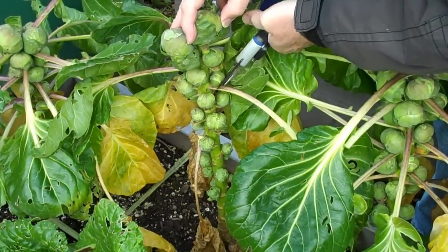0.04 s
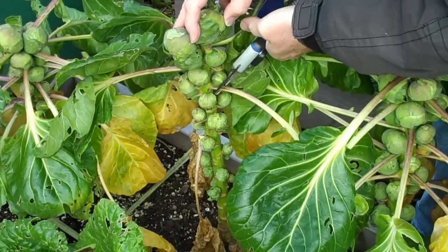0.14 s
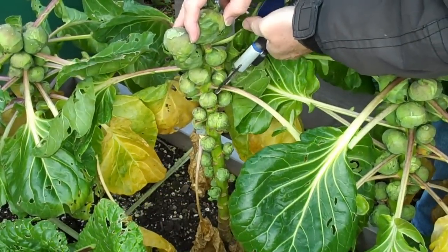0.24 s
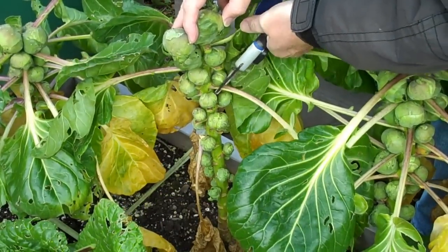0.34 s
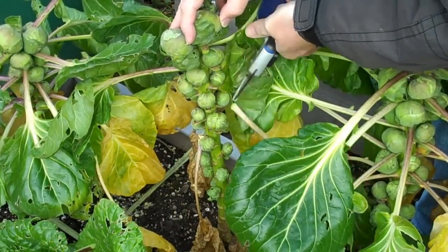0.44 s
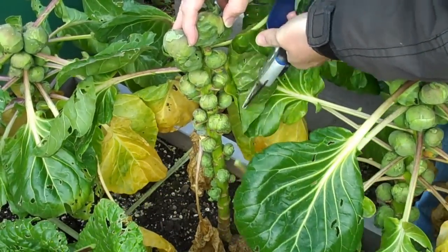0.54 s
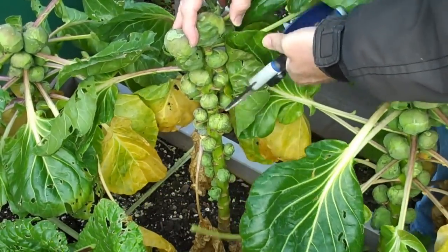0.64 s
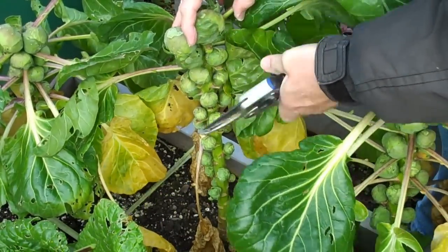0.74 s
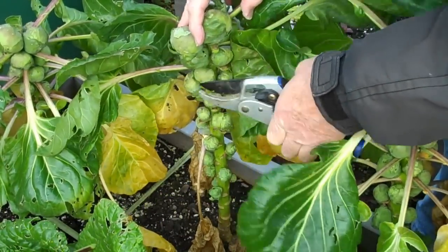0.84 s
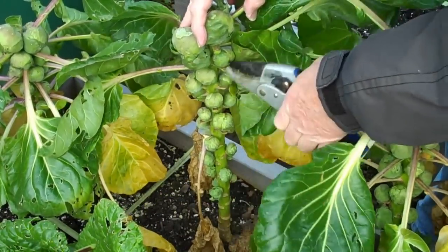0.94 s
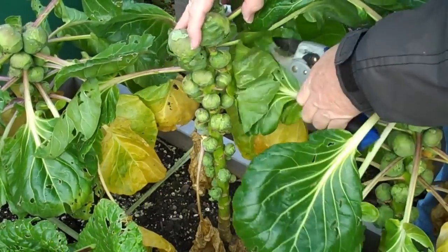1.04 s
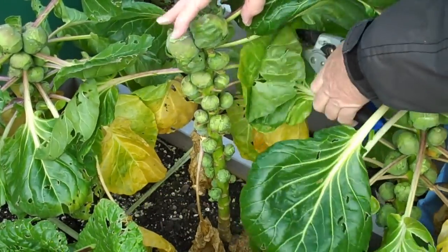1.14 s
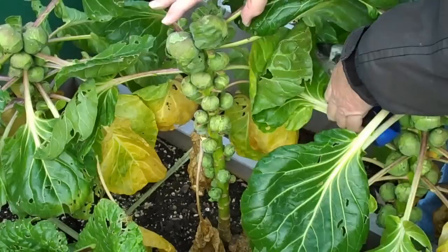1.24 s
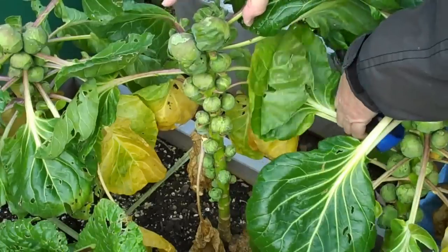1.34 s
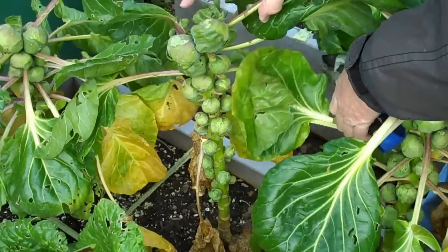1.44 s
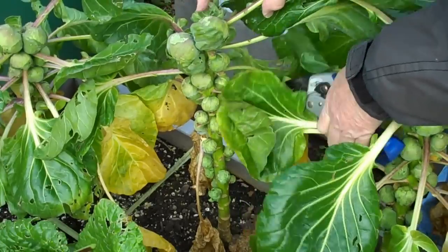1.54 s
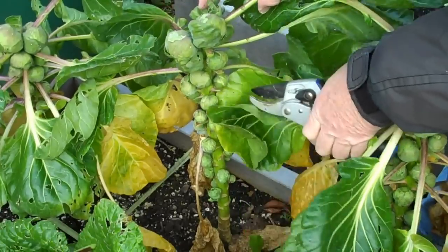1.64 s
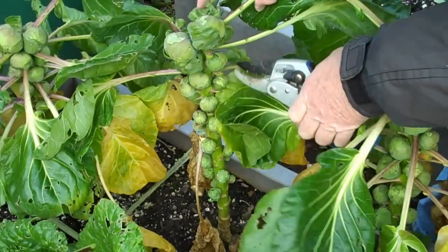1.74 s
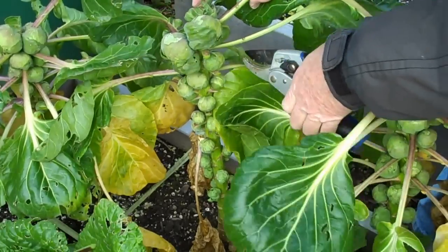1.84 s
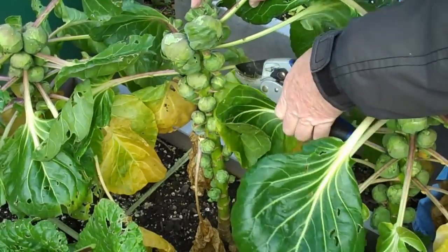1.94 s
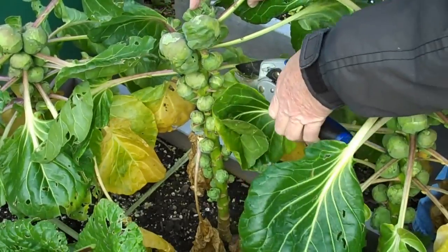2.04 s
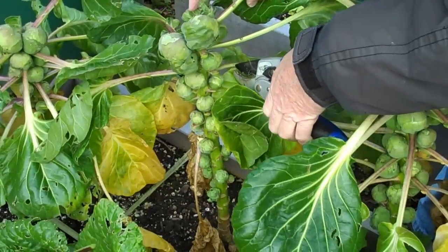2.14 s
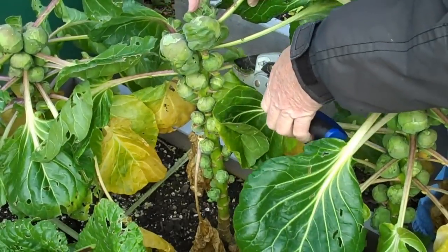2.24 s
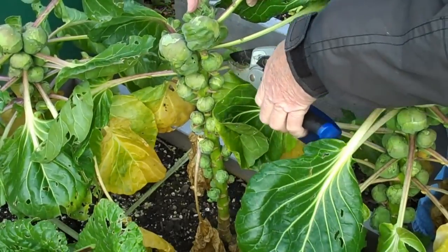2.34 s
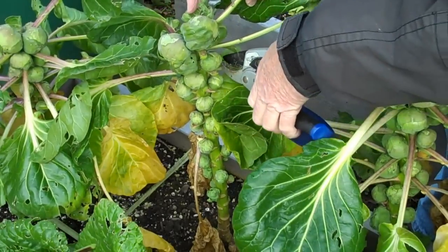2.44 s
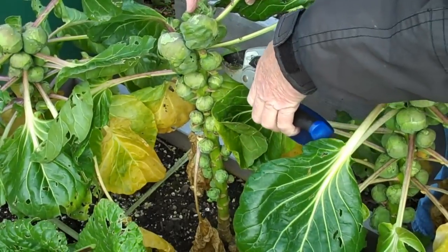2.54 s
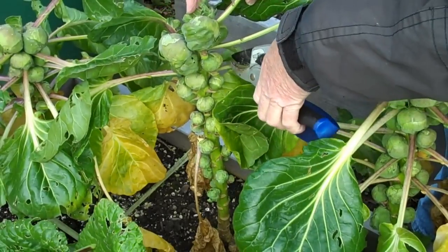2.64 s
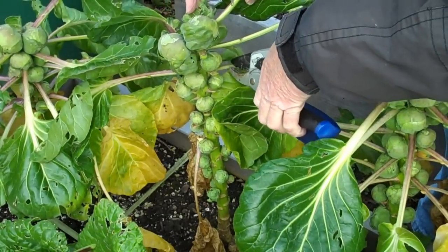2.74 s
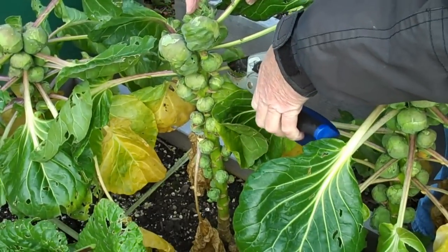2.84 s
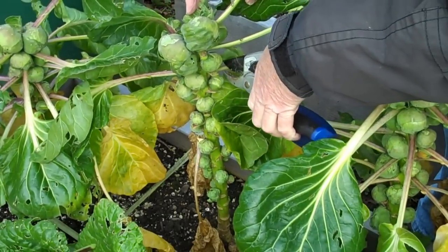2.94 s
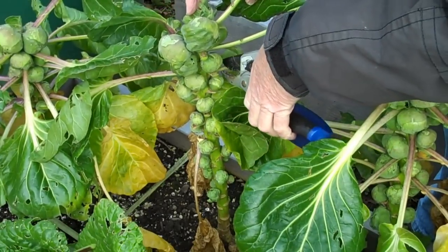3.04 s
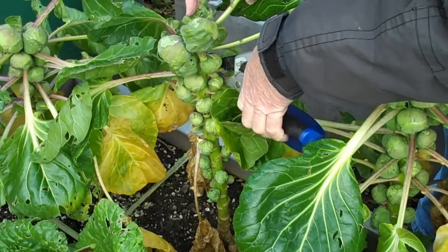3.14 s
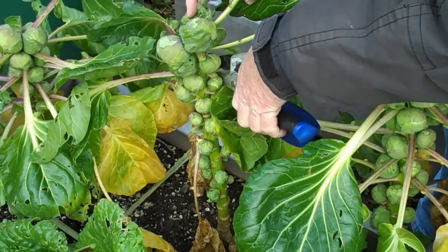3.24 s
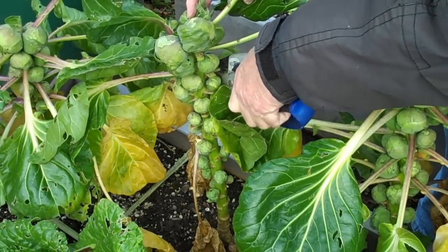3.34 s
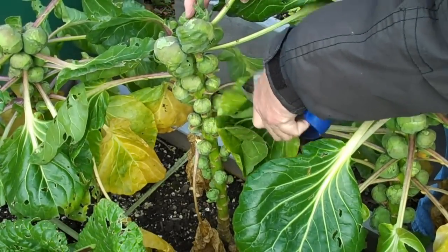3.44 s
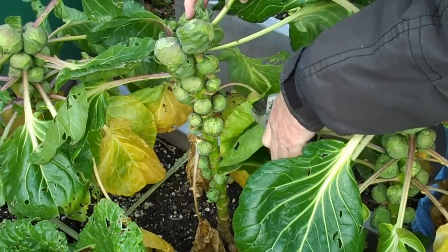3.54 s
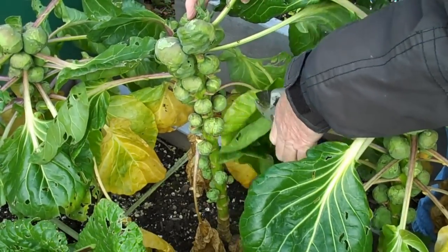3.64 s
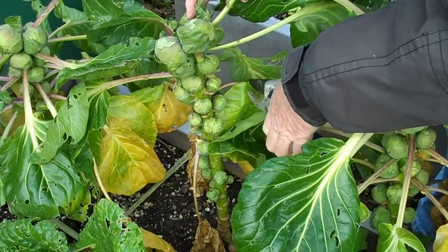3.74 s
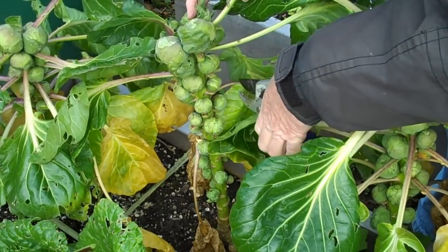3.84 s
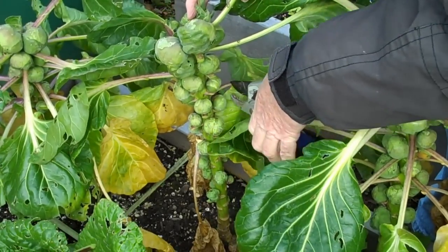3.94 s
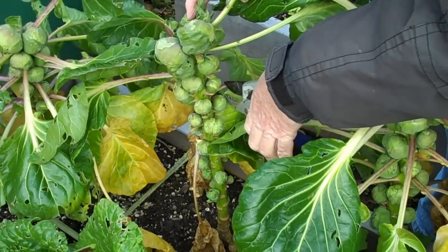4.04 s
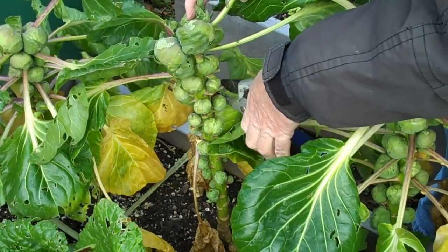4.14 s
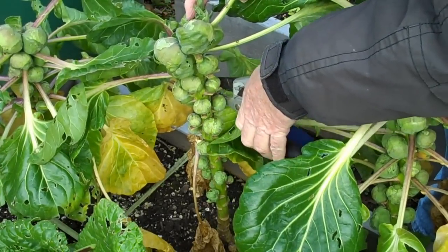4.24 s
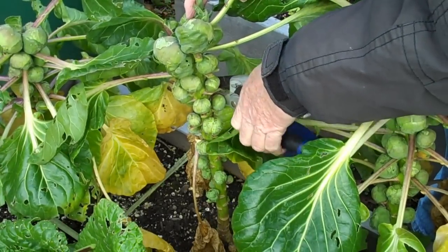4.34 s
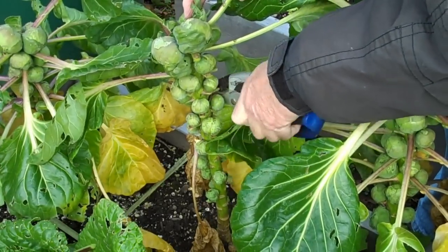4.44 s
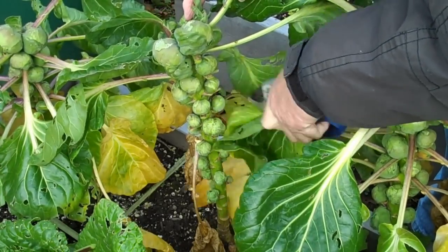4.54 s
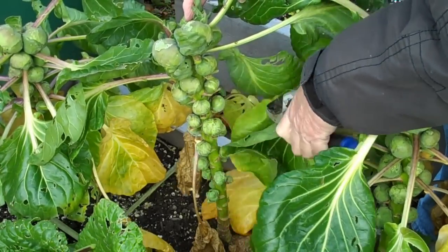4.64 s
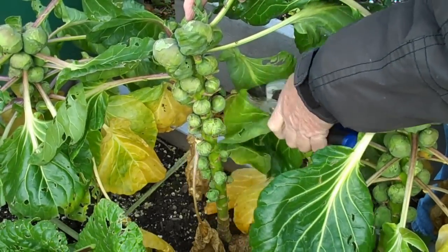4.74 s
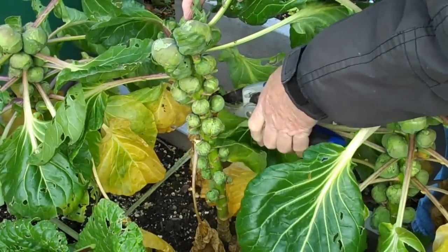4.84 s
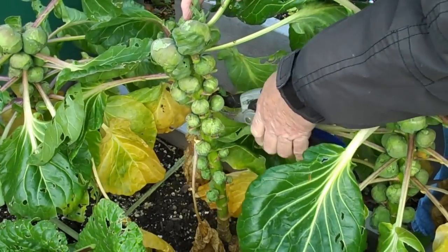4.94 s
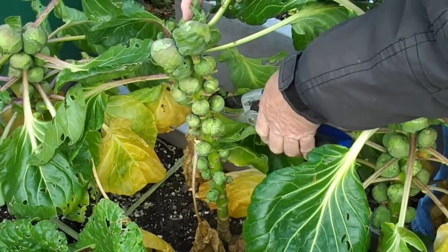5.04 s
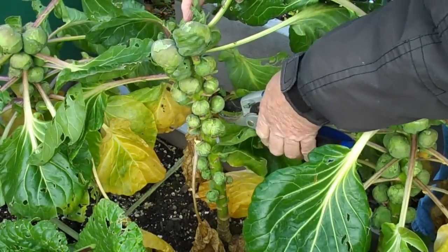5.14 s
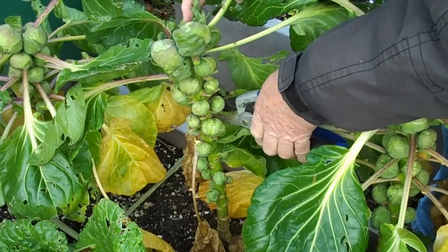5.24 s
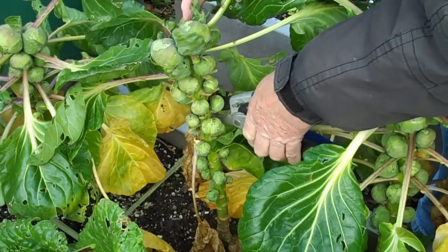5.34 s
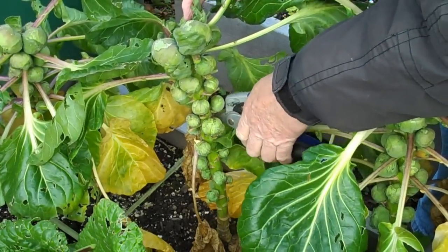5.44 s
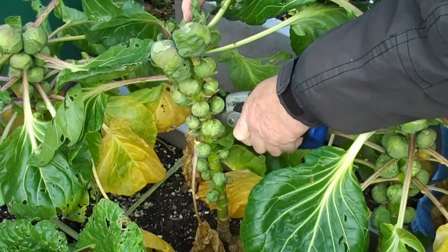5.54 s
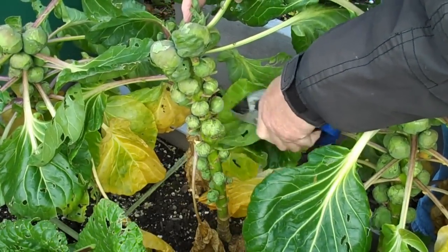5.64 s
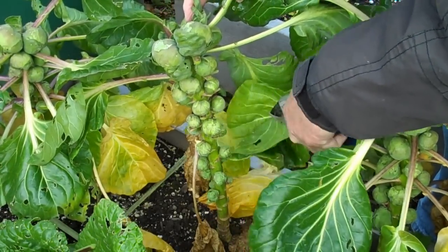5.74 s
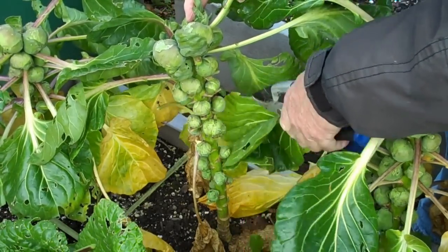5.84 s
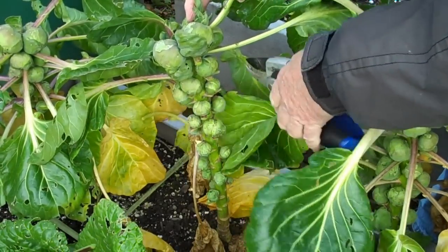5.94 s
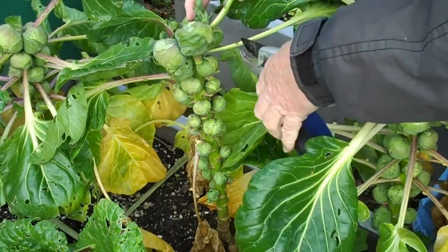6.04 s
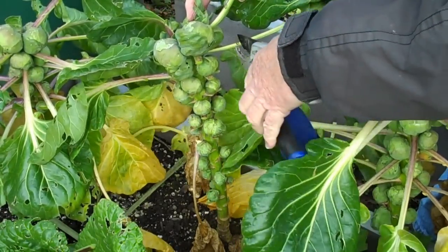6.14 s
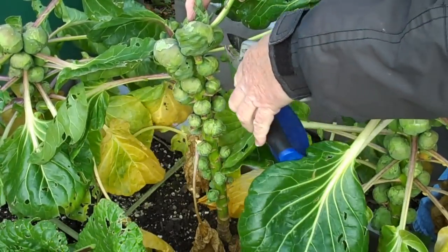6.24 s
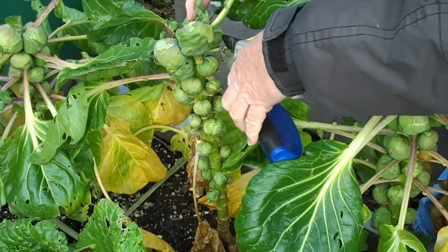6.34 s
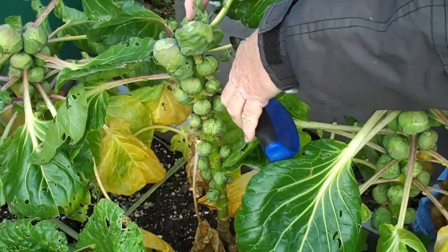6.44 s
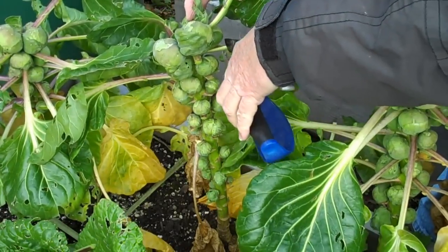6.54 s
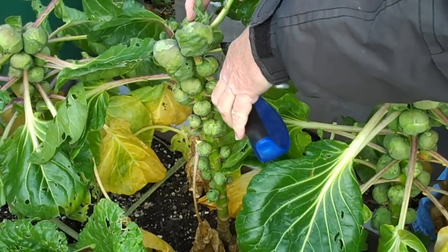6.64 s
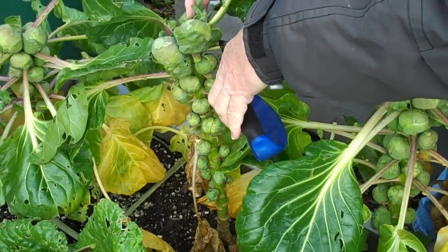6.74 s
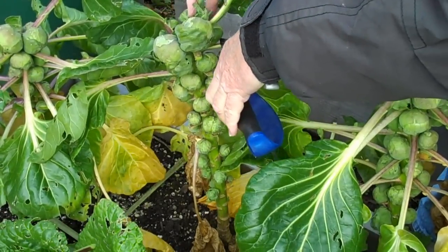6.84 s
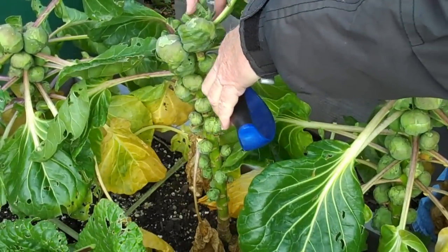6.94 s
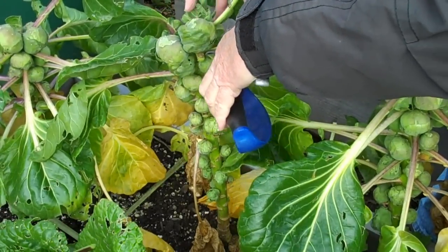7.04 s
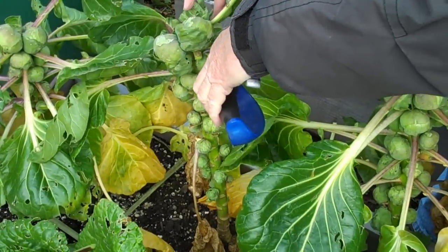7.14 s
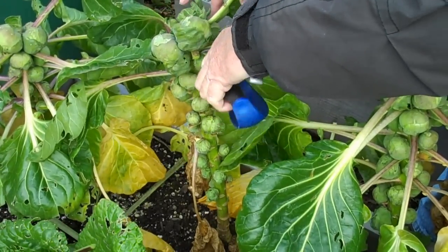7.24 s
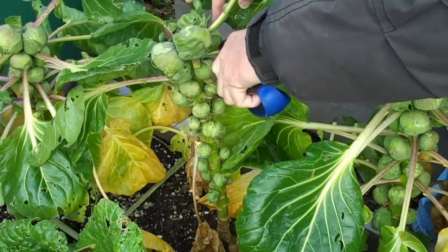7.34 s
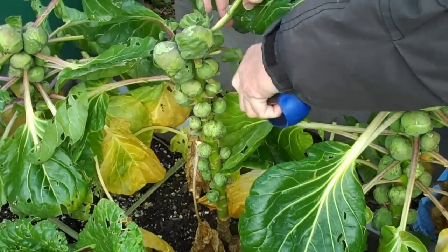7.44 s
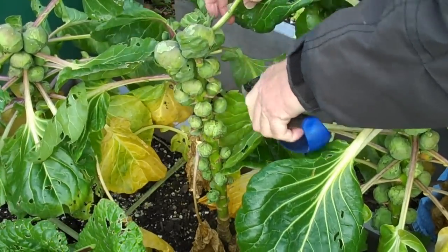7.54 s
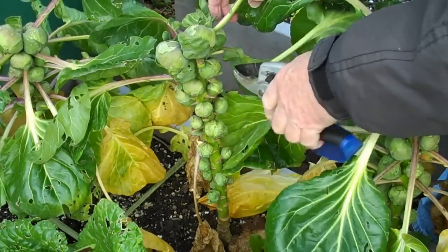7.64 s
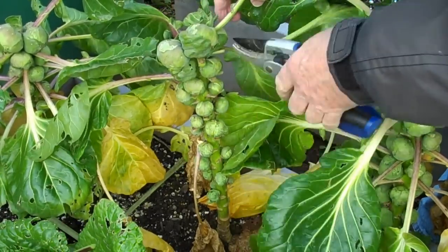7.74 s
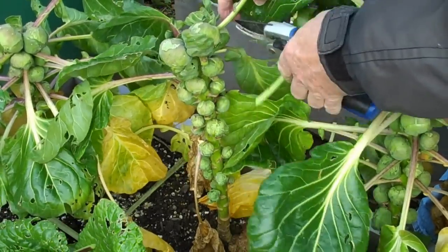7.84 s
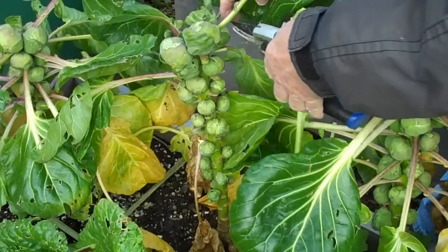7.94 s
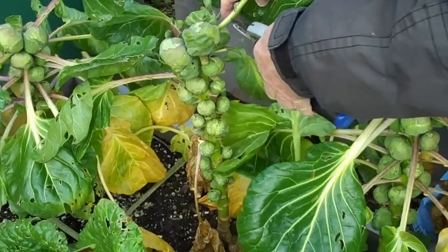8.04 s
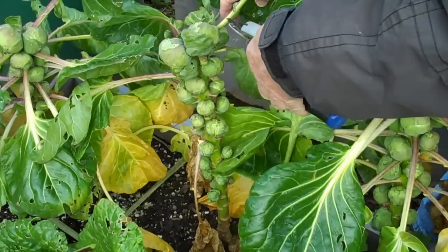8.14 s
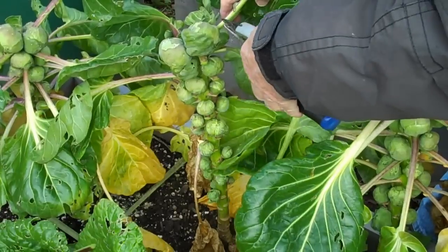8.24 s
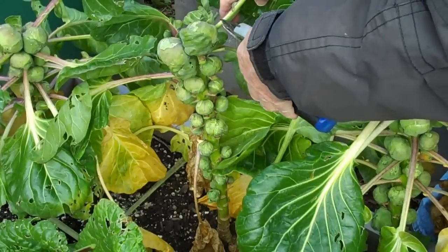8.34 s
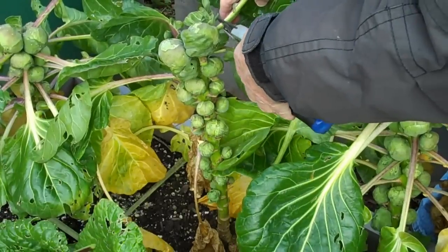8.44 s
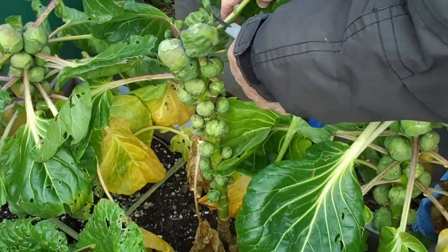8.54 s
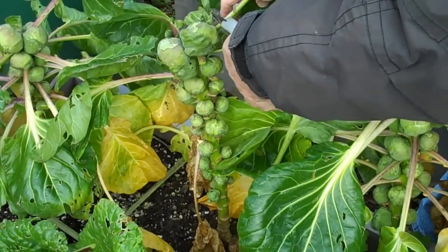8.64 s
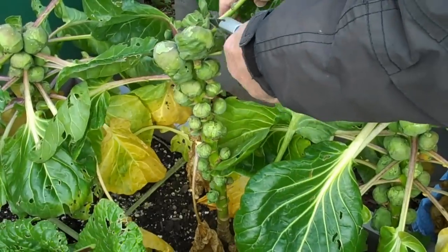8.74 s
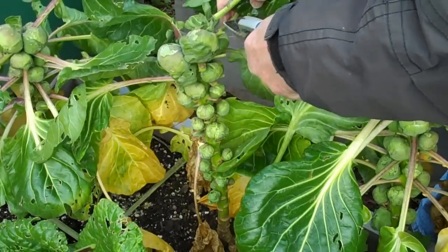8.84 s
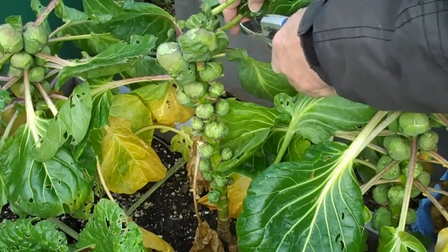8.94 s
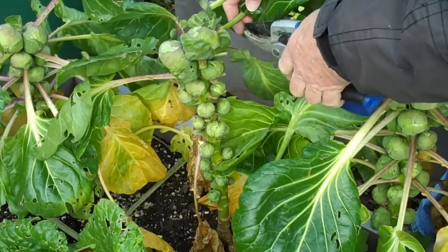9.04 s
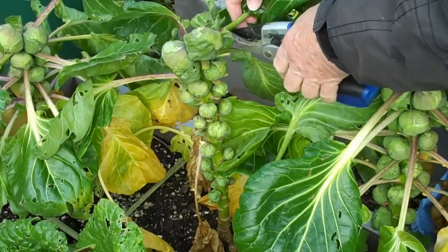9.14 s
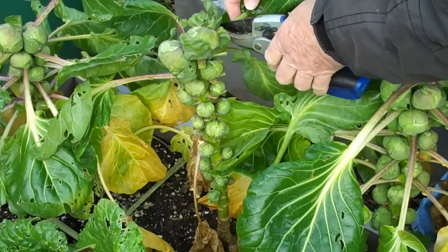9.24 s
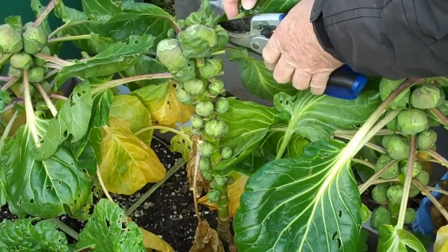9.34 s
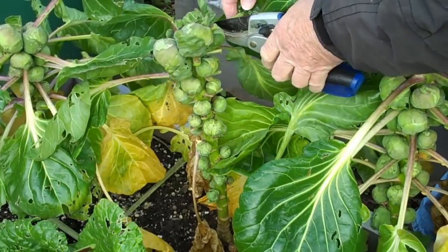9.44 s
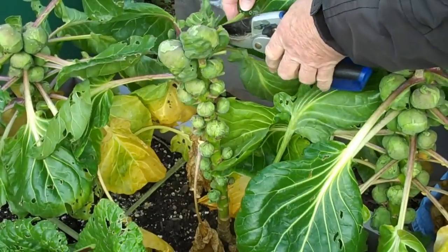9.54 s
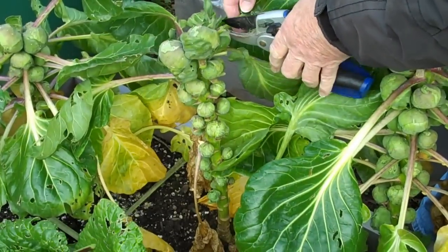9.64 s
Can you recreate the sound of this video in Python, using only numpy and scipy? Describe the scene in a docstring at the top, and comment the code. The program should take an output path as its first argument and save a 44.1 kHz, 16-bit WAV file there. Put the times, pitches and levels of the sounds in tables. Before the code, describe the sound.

Pruning heard up close and dry, in mono, outdoors. Irregular crisp snaps and crackling leaf rustles come in bursts with calmer gaps between. The strongest sound is an early, crunchy stem break with a low puff of air. Later cuts are lighter and hissier. Thin metallic rubs and tiny leaf squeaks slip in between, over a faint, smooth outdoor background.

```python
"""In a garden, close to a small camera's microphone, hand pruning shears cut leaf stems off a sprout stalk.
Stems crack and snap as noise bursts through resonances; one creaks as a run of small cracks. Stiff waxy
leaves rustle and scuff as grainy noise under the moving hand, and their skin squeaks in gliding tones.
The steel of the shears rings faintly in fixed modes when rubbed or knocked. A quiet outdoor hush of
smooth noise lies far behind."""
import sys
import numpy as np
from scipy import signal
from scipy.fft import rfft, irfft, next_fast_len
from scipy.io import wavfile
from scipy.ndimage import uniform_filter1d, map_coordinates

SR = 44100
rng = np.random.default_rng(int(sys.argv[2]) if len(sys.argv) > 2 else 0)


def dump_mix(stems):
    """Bounce the given channels to the path in sys.argv[1] as a 16-bit WAV at rate SR."""
    frames = np.atleast_2d(stems).T  # one column per channel
    limited = np.clip(frames, -1, 1)  # hard clip at full scale
    pcm = np.round(limited * 32767).astype(np.int16)
    wavfile.write(sys.argv[1], SR, pcm)


N = 427769
TIME = np.arange(N) / SR  # s
BURST = SR // 8  # samples given to one crack

# Cuts and stem breaks. Each row: start in seconds, stalk knock peak in dB, tearing and its centre in dB above
# the knock and Hz, hiss in dB above the knock, gain of the air push in dB, main 60 dB fade in seconds.
CUTS = [(0.478, -29.5, 10, 5400, 8.5, -38, 0.016), (1.2609, -10.5, -2.5, 5900, -5, -13, 0.033),
        (1.385, -19, 5, 3640, 4, -27.5, 0.039), (4.434, -29.5, 14, 6040, 4, -31.5, 0.038),
        (8.559, -32.5, 7, 5460, 5.5, -45, 0.035), (8.609, -30.5, 6.5, 6500, 11, -35, 0.038),
        (8.774, -33, 11.5, 3270, 13.5, -27.5, 0.04)]
# Fibres and leaf ribs that snap. Each row: start in seconds, knock peak in dB, knock pitch in Hz,
# hiss in dB above the knock.
SNAPS = [(0.1092, -38.5, 1575, -15.5), (0.242, -36, 4000, -12), (0.264, -37.5, 1700, -3),
         (0.373, -36, 4735, 5), (0.3959, -33.5, 1872, 8), (0.416, -35, 1840, -18), (0.4417, -40, 5980, 9),
         (0.4537, -35, 3320, -15), (0.535, -34, 3700, -14), (0.6, -49, 3000, 12), (0.684, -37, 3000, -15),
         (0.777, -37, 1700, -20), (0.83, -28.5, 1877, -20), (1.1219, -30.5, 2330, -23),
         (1.3004, -26, 2690, -9), (1.3417, -36, 2710, -4), (1.4151, -36.5, 5233, -8),
         (1.509, -45, 1600, -20), (1.6836, -37.5, 2300, -18), (1.81, -40, 3750, -22),
         (1.882, -55, 5000, 13), (1.943, -40.5, 1080, -20), (1.967, -43.5, 3500, -13),
         (2.003, -42, 2490, -4), (2.055, -34, 2450, 0), (2.2884, -36.5, 2550, -3), (2.3475, -49.5, 4050, 3),
         (2.7, -47, 3000, -15), (3.1865, -33.5, 3440, 4.5), (3.3234, -31.5, 3070, -24),
         (3.4019, -27, 3740, -0.5), (3.4312, -33.5, 2600, 1), (3.535, -40.5, 2920, -12),
         (3.6354, -37, 1400, -3), (3.8337, -55, 3570, 14), (3.8624, -39, 3520, 5),
         (4.037, -37.5, 5700, -25), (4.2825, -35, 4050, -2), (4.357, -31.5, 3200, -7),
         (4.3609, -30, 5420, -6), (4.417, -36, 6300, -8), (4.4999, -30.5, 5135, -11),
         (4.788, -47, 1890, -20), (4.94, -44.5, 3726, 8), (4.9686, -35, 4680, 2),
         (4.9808, -28.5, 3260, -20), (5.0438, -42, 2440, -12), (5.3732, -37.5, 3240, -19),
         (5.604, -36, 1250, -20), (6.0857, -41.5, 4630, 8.5), (6.1157, -39.5, 4830, -7),
         (6.451, -51, 3590, 1), (6.463, -51, 4000, 7), (6.4963, -32.5, 4730, 0), (6.7012, -43, 3340, 1),
         (6.7874, -38.5, 2250, -26), (6.8496, -40, 2120, -28), (6.949, -43, 3050, 2),
         (7.194, -56, 2066, 14), (7.219, -30.5, 2900, -18), (7.2521, -32.5, 4540, -4),
         (7.322, -40, 2280, -1), (7.329, -39, 4500, 4.5), (7.337, -38, 3570, 4), (7.36, -36, 5270, -5),
         (7.4066, -30, 1580, -23), (7.5006, -38.5, 5500, -17), (7.559, -44.5, 5060, 2),
         (7.631, -38.5, 3920, -17.5), (7.7886, -36, 1570, -16), (7.805, -34.5, 3800, -3),
         (7.854, -42, 1450, -20), (7.914, -39.5, 3470, -5), (7.9727, -29.5, 3600, -1.5),
         (8.006, -52, 4000, 9), (8.535, -40, 3260, -16), (8.5498, -28.5, 5330, 2), (8.692, -37, 1490, -20),
         (8.7015, -27.5, 5460, -6), (8.746, -40.5, 4800, 3), (8.8018, -27.5, 4900, 1.5),
         (8.8198, -24.5, 4970, -7), (9.2367, -44.5, 3570, 0), (9.2732, -43.5, 3600, 5.5),
         (9.627, -35, 3680, -3), (9.681, -35.5, 3670, -3)]
# The stalk's resonances. Each row: centre in Hz, width in Hz, level in dB.
STALK = [(1160, 300, -9), (1770, 260, 0), (2130, 330, -1), (2750, 500, -8)]
# A stem bending before it gives. The row: start and end in seconds, slips per second, mean peak in dB,
# pitch in Hz.
CREAK = (.309, .366, 114, -41, 1750)
# Leaves pushed by the hand. Each row: full strength from in seconds, held for in seconds,
# crisp rustle in dB, dull brushing in dB.
PUSHES = [(0.0, 0.091, -54, -59), (0.15, 0.072, -49, -55), (0.4, 0.094, -48.5, -53),
          (0.5, 0.25, -53.5, -57.5), (0.69, 0.047, -52, -60.5), (0.85, 0.13, -55, -59),
          (1.0, 0.1, -60.5, -60.5), (1.13, 0.14, -51.5, -54), (1.399, 0.0089, -50.5, -53.5),
          (1.5, .54, -58.5, -59.5), (1.68, 0.09, -55.5, -69), (2.67, 0.023, -63.5, -77),
          (3.1, 0.15, -67, -82), (3.335, 0.025, -54, -64.5), (3.41, 0.042, -51.5, -63),
          (3.49, 0.097, -55, -62.5), (3.64, 0.016, -53.5, -54.5), (3.78, 0.0095, -54, -62),
          (4.24, 0.055, -69, -83), (4.524, .005, -50.5, -74), (4.658, 0.0049, -46, -57.5),
          (4.72, .25, -54.5, -62), (5.4, 0.15, -59.5, -65.5), (5.616, 0.0046, -48.5, -61),
          (5.75, 0.032, -49.5, -59), (5.84, 0.096, -58.5, -64.5), (5.96, 0.068, -51.5, -62.5),
          (6.08, .05, -52.5, -56), (6.26, 0.052, -65.5, -68), (6.49, 0.0082, -64, -66),
          (6.75, 0.023, -60.5, -66), (6.97, .01, -62.5, -70), (7.225, 0.024, -53, -55.5),
          (7.335, 0.038, -48.5, -54), (7.45, .2, -63, -68), (7.665, 0.17, -55, -57.5),
          (7.88, 0.11, -59, -59.5), (8.05, 0.043, -54.5, -60), (8.56, 0.095, -61, -64),
          (8.71, 0.0073, -55.5, -61), (8.8, 0.021, -52, -56), (8.9, 0.19, -59.5, -65),
          (9.1, 0.048, -53.5, -62), (9.24, 0.083, -62.5, -62), (9.69, .01, -50.5, -58)]
# Spectrum of the crisp rustle. Each row: frequency in Hz, density in dB per Hz (relative).
CRISP_SPECTRUM = [(880, -28), (1500, -4.5), (2150, -1.5), (3380, -0.5), (4360, -2), (5560, -0.5), (6030, 1),
                  (10900, -5), (13000, -14.5)]
# Spectrum of the dull brushing. Each row: frequency in Hz, density in dB per Hz (relative).
DULL_SPECTRUM = [(180, -34), (300, -9), (1000, -0.5), (1500, 0), (2200, -4), (3500, -5.5), (6000, -16),
                 (13000, -72)]
# Short scuffs of blade or hand over a leaf. Each row: middle in seconds, level there in dB,
# time from the middle to 1/e in seconds, centre in Hz.
SCUFFS = [(0.458, -33, 0.0048, 5030), (1.142, -41.5, 0.011, 2420), (3.426, -44.5, 0.014, 4040),
          (4.427, -38, 0.0082, 3300), (4.514, -42, 0.011, 4000), (4.677, -46, 0.01, 4000),
          (5.614, -40.5, 0.012, 3800), (5.965, -48.5, 0.016, 5030), (8.713, -37.5, 0.0072, 4460)]
# Waxy skin sticking and slipping. Each row: start in seconds, length in seconds, gain in dB,
# first and last pitch in Hz before the wavering.
SQUEAKS = [(1.899, 0.048, -51.5, 2100, 2300), (3.628, 0.028, -46, 6420, 6670),
           (3.642, 0.048, -54, 2760, 2930), (3.725, 0.037, -55, 7240, 8200),
           (4.751, 0.024, -52.5, 2810, 2640), (5.97, 0.022, -48, 2920, 3070),
           (6.009, 0.022, -54, 2120, 2150), (7.683, 0.034, -51.5, 2710, 2720),
           (9.095, 0.023, -45, 2690, 2870)]
# Rubs of the steel spring and blades. Each row: start in seconds, length in seconds, gain in dB before
# the swell and fade, frequency in Hz near which the grip lets the steel ring.
RUBS = [(2.1, .08, -66, 3700), (2.38, .09, -69, 3400), (2.745, .11, -71, 3650), (2.8, .27, -71.5, 3380),
        (3.34, .05, -61, 8400), (3.785, .07, -60, 4500), (4.28, .05, -60, 4660), (4.357, .018, -52, 8300),
        (5.48, .07, -62, 9900), (5.5, .07, -62, 5060), (5.51, .06, -60, 3300), (6.08, .035, -53, 8300),
        (6.085, .08, -59, 4660), (6.97, .045, -66, 4400), (7.795, .035, -50, 8400), (7.9, .03, -57, 3570),
        (7.965, .04, -54, 8400), (9.235, .095, -56, 3800)]
# Modes of the steel. Each row: frequency in Hz, level in dB, 60 dB fade in seconds.
STEEL = [(3310, -2, .15), (3570, 0, .2), (4660, 0, .2), (5450, -1, .15), (6250, -4, .15), (8350, 0, .12),
         (9930, 0, .1)]
# Spectrum of the far outdoor hush. Each row: frequency in Hz, density in dB per Hz (relative).
HUSH_SPECTRUM = [(12, -48), (20, -2), (49, -7), (175, -13.5), (546, -16), (735, -11), (1750, -27),
                 (1900, -42), (8200, -21.5), (11000, -36.5), (13000, -34)]

HUSH_DB = -68.5  # mean level
TOP_HZ = 12900  # band limit of the camera
RISE_DB_PER_S, SETTLE_DB_PER_S = 270, 213  # how fast a push swells and the leaves come to rest
REST_CRISP_DB, REST_DULL_DB = -69, -68  # the plants stir faintly when left alone
SWAY_DB, SWAY_DB_PER_S = -10, 43  # the leaves sway on after a push: level under it, slower fade


def stems():
    """Snaps crack; a full cut knocks the stalk and gives one low push of air as the stem lets go."""
    out = np.zeros(N + SR)
    for start, db, hz, hiss_db in SNAPS:
        knock = [(hz, 0.34 * hz, 0)]
        tear_db = -3.5 + 0.25 * min(hiss_db, 0)
        out[round(start * SR):][:BURST] += crack(db, knock, tear_db, hiss_db, t60=0.044)
    for start, db, tear_db, tear_hz, hiss_db, push_db, t60 in CUTS:
        u = TIME[:BURST] / 0.00032
        air_push = amp(push_db) * u * (2 - u) * np.exp(-u)
        burst = crack(db, STALK, tear_db, hiss_db, t60, (tear_hz, 2800, 0))
        out[round(start * SR):][:BURST] += burst + air_push
    return out[:N]


def crack(db, modes, tear_db, hiss_db, t60, tear=(4300, 6700, 0)):
    """A burst that knocks the given resonances, tears in the middle and hisses above; near leaves scatter a tail."""
    t = TIME[:BURST]
    onset = 1 - np.exp(-t / .0001)
    decay = amp(-60 * t / t60) + 1.12 * amp(-60 * t / 0.0071)
    tail = 0.0082 * amp(-60 * t / 0.16)
    noise = onset * (decay + tail) * rng.standard_normal((3, len(t)))
    noise[:, 10] += 2.5  # the first fibre parts at one blow
    knock = resonant(noise[0], modes)
    tearing = resonant(resonant(noise[1], [(3860, 6400, 0)]), [tear])
    hiss = resonant(resonant(noise[2], [(8400, 3800, 0)]), [(8320, 3700, 0)])
    parts = np.array([knock, tearing, hiss])
    parts /= abs(parts).max(axis=1, keepdims=True)
    return amp(db) * (amp([0, tear_db, hiss_db]) @ parts)


def creak():
    """Stick-slip of the bending stem: a quick, slightly uneven run of small cracks."""
    out = np.zeros(N)
    start, end, rate, db, hz = CREAK
    for slip in np.arange(start, end, 1 / rate):
        first = round((slip + rng.normal(0, .0009)) * SR)
        slip_db = db + rng.normal(0, 1.3)
        out[first:][:BURST] += crack(slip_db, [(hz, 350, 0)], -2, -4, t60=0.015)
    return out


def leaves():
    """Waxy leaves crackle in clumps and tick; the broad blades brush with a duller sound."""
    crisp_gain, dull_gain = pushes()
    clump = wobble(30)  # dB
    crackle = amp(1.24 * clump) * grainy(rate=370, spread_db=7.0, t60=0.014, share=0.34)
    brushing = amp(clump) * grainy(rate=300, spread_db=4.5, t60=0.012, share=0.3)
    crisp = coloured(patchy(crackle, depth_db=2.5), CRISP_SPECTRUM)
    dull = coloured(patchy(brushing, depth_db=2.5), DULL_SPECTRUM)
    tick_gain = (crisp_gain - crisp_gain.min()) * amp(-9.5)  # none at the quietest rest
    return crisp_gain * crisp + tick_gain * ticks(count=2000, spread_db=15.5) + dull_gain * dull


def pushes():
    """Crisp and dull gain of the leaves: every push rises, holds, settles and sways on; their powers add."""
    power = amp([[REST_CRISP_DB], [REST_DULL_DB]]) ** 2 * np.ones(N)
    for start, hold, crisp_db, dull_db in PUSHES:
        span = slice(max(round((start - .3) * SR), 0), round((start + hold + 0.95) * SR))
        before = np.maximum(start - TIME[span], 0)
        after = np.maximum(TIME[span] - start - hold, 0)
        fall_db = np.maximum(-SETTLE_DB_PER_S * after, SWAY_DB - SWAY_DB_PER_S * after)
        power[:, span] += amp([[crisp_db], [dull_db]] + fall_db - RISE_DB_PER_S * before) ** 2
    return np.sqrt(power)


def patchy(x, depth_db):
    """x with random patches of gain in time and frequency, as other leaves take over."""
    z = signal.stft(x, nperseg=256)[2]
    field = uniform_filter1d(rng.standard_normal(z.shape), size=3, axis=0)
    field = uniform_filter1d(field, size=6, axis=1)
    return signal.istft(z * amp(depth_db * field / field.std()), nperseg=256)[1][:N]


def ticks(count, spread_db):
    """Small pitched ticks of leaf ribs, each fading within a few cycles, rms 1."""
    when, pitch, life, size = rng.random((count, 4)).T[..., None]
    hz = 1600 * 6 ** pitch
    t = TIME[:SR // 80]
    decay = np.exp(-t * hz / (0.61 + 9 * life ** 2))
    grains = amp(spread_db * size ** 3) * np.sin(2 * np.pi * hz * t) * decay
    where = (when * N).astype(int) + np.arange(len(t))
    return unit(np.bincount(where.ravel(), grains.ravel(), minlength=2 * N)[:N])


def scuffs():
    """Each scuff is a swell of grainy friction noise around its centre pitch."""
    out = np.zeros(N)
    grit = grainy(rate=670, spread_db=0.0, t60=0.0031, share=0.44)
    for middle, db, length, hz in SCUFFS:
        span = slice(round((middle - .1) * SR), round((middle + 0.3) * SR))
        rub = unit(resonant(grit[span], [(hz, 2.8 * hz, 0)]))
        out[span] += amp(db) * np.exp(-((TIME[span] - middle) / length) ** 2) * rub
    return out


def squeaks():
    """Stick-slip of waxy skin: short gliding tones with an unsteady pitch and level and a weak octave."""
    out, waver, rasp = np.zeros(N), wobble(200), wobble(180)
    for start, length, db, first_hz, last_hz in SQUEAKS:
        span = slice(round(start * SR), round((start + length) * SR))
        part = (TIME[span] - start) / length
        hz = (first_hz + (last_hz - first_hz) * part) * (1 + 0.0083 * waver[span])
        phase = 2 * np.pi * np.cumsum(hz) / SR
        tone = np.sin(phase) + 0.12 * np.sin(2 * phase)
        out[span] += amp(db + 4.5 * rasp[span]) * np.sin(np.pi * part) ** 2 * tone
    return out


def steel(knocks):
    """Rubs sing in the modes that the grip leaves free, each mode wavering; every crack stirs all modes a little."""
    modes = [(hz, np.log(1000) / (np.pi * t60), db) for hz, db, t60 in STEEL]
    out = amp(-15) * resonant(knocks, modes)
    hz, level_db = np.array(STEEL).T[:2, :, None]
    waver = np.array([wobble(90) for mode in STEEL])  # of phase
    flicker = np.array([wobble(90) for mode in STEEL])  # of level
    for start, length, db, free_hz in RUBS:
        span = slice(round(start * SR), round((start + length) * SR))
        part = abs(TIME[span] - start) / length
        damping_db = 85 * abs(np.log2(hz / free_hz))
        free = amp(level_db - damping_db + 3.6 * flicker[:, span])
        tones = np.sin(2 * np.pi * hz * TIME[span] + 0.9 * waver[:, span])
        swell = np.minimum(6 * part, 1) * abs(1 - part) ** .8
        out[span] += amp(db) * swell * unit(np.sum(free * tones, axis=0))
    return out


def hush():
    """The far, smooth outdoor background: coloured noise whose level drifts a little."""
    return amp(HUSH_DB + 1.1 * wobble(2.774)) * coloured(rng.standard_normal(N), HUSH_SPECTRUM)


def grainy(rate, spread_db, t60, share):
    """Noise swelling at rate tiny clicks a second, their sizes spread in dB, rms near 1."""
    sizes = amp(spread_db * np.minimum(rng.exponential(size=N), 3.2))
    clicks = (rng.random(N) < rate / SR) * sizes
    lumps = signal.fftconvolve(clicks, amp(-60 * TIME[:1000] / t60))[:N]
    return rng.standard_normal(N) * (1 - share + share * unit(lumps))


def wobble(rate):
    """A smooth random curve, rate knots a second."""
    return map_coordinates(rng.standard_normal(int(N * rate / SR) + 4), [TIME * rate])


def amp(db):
    """Gain of a level in dB."""
    return 10 ** (np.asarray(db) / 20)


def unit(x):
    """Rows scaled to rms 1."""
    return x / np.sqrt(np.mean(x ** 2, axis=-1, keepdims=True) + 1e-20)


def filtered(x, response):
    """x times a complex response of frequency."""
    m = next_fast_len(x.shape[-1] + 8192)  # padded, so that ringing does not wrap round
    return irfft(rfft(x, m) * response(np.fft.rfftfreq(m, 1 / SR)), m)[..., :x.shape[-1]]


def coloured(x, points):
    """x through a (Hz, dB) spectrum read on a log axis, rms 1."""
    f, db = np.transpose(points)
    return unit(filtered(x, lambda hz: amp(np.interp(np.log(hz + 1), np.log(f + 1), db))))


def resonant(x, modes):
    """x through causal resonances (Hz, width Hz, dB) of alternating sign."""
    def response(f):
        total = 0
        for k, (centre, width, db) in enumerate(modes):
            damping = 1j * f * width
            total = total + (-1) ** k * amp(db) * damping / (centre * centre - f * f + damping)
        return total
    return filtered(x, response)


def scene():
    """All sources, one channel."""
    cracks = stems()
    plant = cracks + creak() + leaves() + scuffs() + squeaks()
    return (plant + steel(cracks) + hush())[None]


def record(dry):
    """The camera adds a small, drifting offset and keeps nothing above its band limit."""
    offset = -.00055 + .00022 * wobble(9)
    return filtered(dry + offset, lambda hz: hz < TOP_HZ)


dry = scene()
out = record(dry)
dump_mix(out)
```